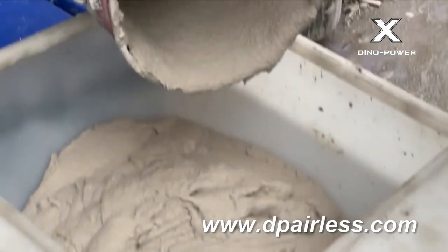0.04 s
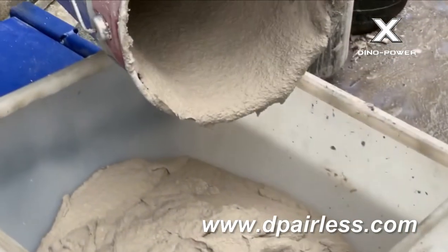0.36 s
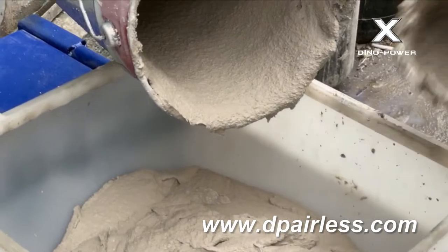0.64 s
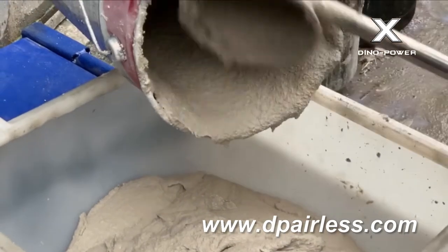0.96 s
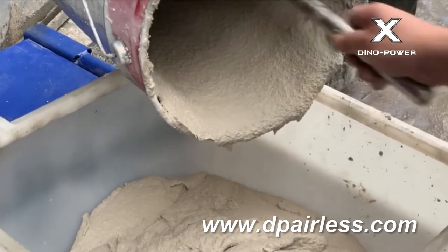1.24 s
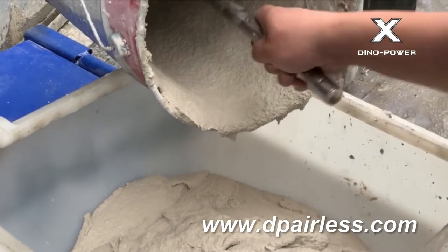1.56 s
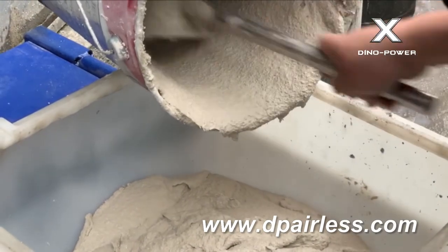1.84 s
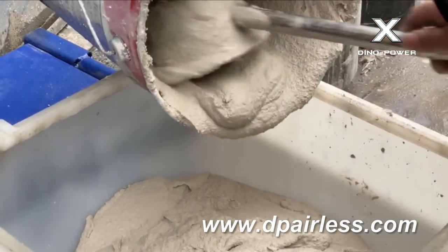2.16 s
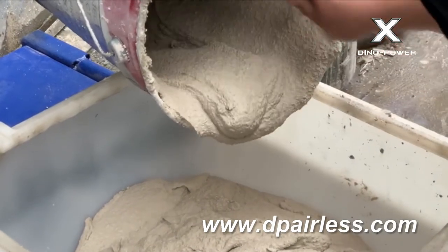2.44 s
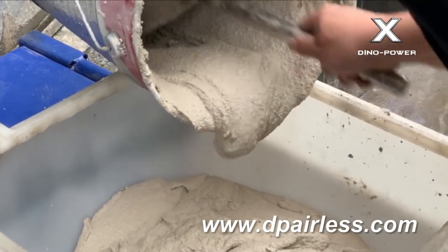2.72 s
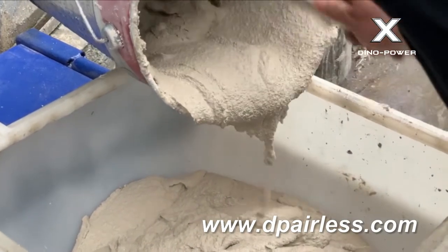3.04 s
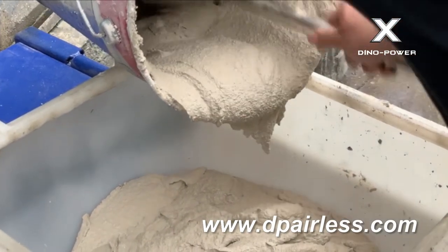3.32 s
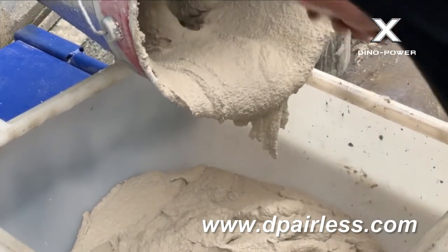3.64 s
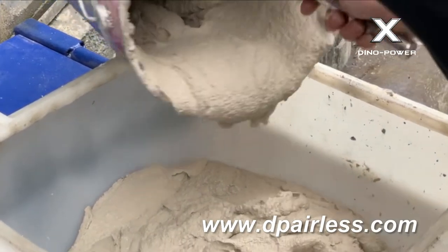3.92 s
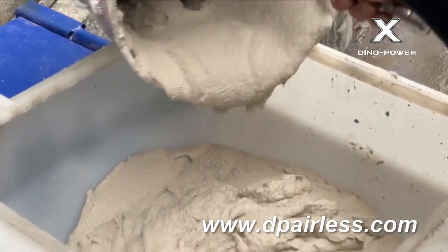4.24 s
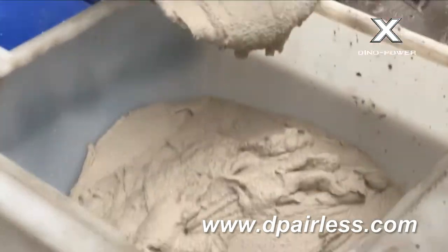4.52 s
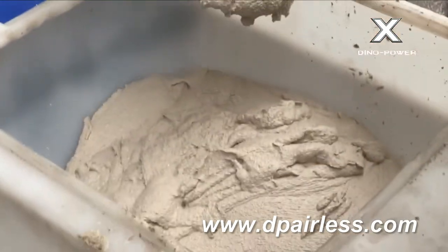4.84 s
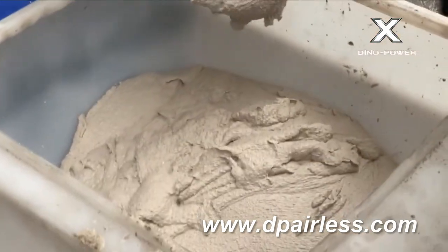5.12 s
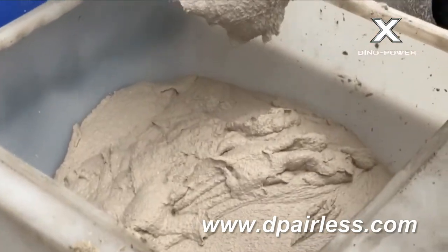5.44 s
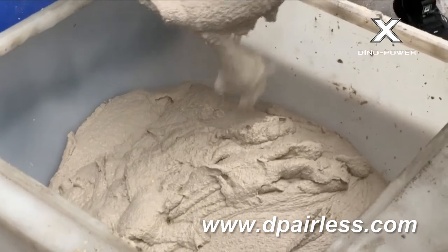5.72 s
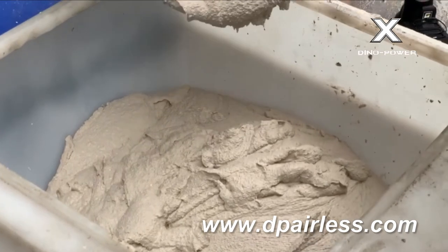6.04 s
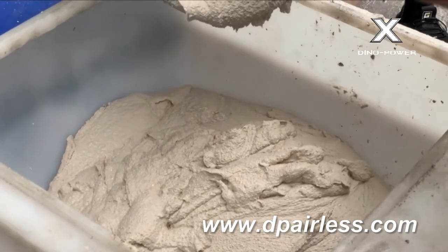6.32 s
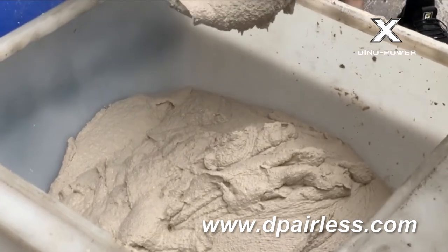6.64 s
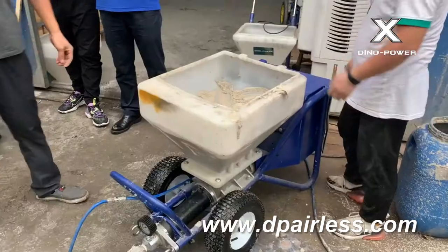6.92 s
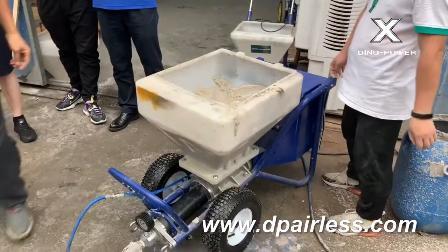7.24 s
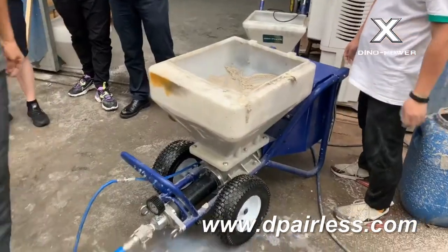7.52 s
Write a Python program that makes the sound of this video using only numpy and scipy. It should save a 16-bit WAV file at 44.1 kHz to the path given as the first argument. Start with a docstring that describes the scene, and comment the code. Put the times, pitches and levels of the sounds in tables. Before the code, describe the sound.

Rushing fan air, a low drone and a humming, whining motor fill a yard as a plaster pump runs, its pitch sagging a little under load. Nearby and central, a steel shovel rasps through wet plaster in a plastic bucket, drags with a brief hollow groan, and knocks softly against the bucket at uneven intervals. The machine stays the main sound and carries on until an abrupt cut.

```python
"""From the start a plaster pump runs, heard at two microphone ports: a low drone, a rush of cooling air,
and a fast motor whose hum of shaft orders and thin high whine sag a little in pitch with load.
Close by, a shovel scrapes wet plaster out of a plastic bucket: first sand grains ring the blade in gritty
rasps, then near 2 s it drags along the wall with a stick-slip groan. Dull bumps of the bucket come and go
until about 6 s. The machine runs on, and the sound stops dead just before 7 s."""
import sys
import numpy as np
from scipy import signal
from scipy.fft import rfft, irfft, next_fast_len
from scipy.io import wavfile
from scipy.ndimage import uniform_filter1d

SR = 44100
rng = np.random.default_rng(int(sys.argv[2]) if len(sys.argv) > 2 else 0)


def waveform_to_disk(signal):
    """Save audio, clipped to [-1, 1], as 16-bit WAV at the path in sys.argv[1]."""
    frames = np.transpose(np.atleast_2d(signal))
    scaled = np.clip(frames, -1, 1) * 32767
    samples = np.round(scaled).astype(np.int16)
    wavfile.write(sys.argv[1], SR, samples)


N = 342657
TIME = np.arange(N) / SR


def gain_of(db):
    """Amplitude ratio of a level in decibels."""
    return 10 ** (np.asarray(db) / 20)


def unit_rms(x):
    """Normalisation to rms 1."""
    return x / np.sqrt(np.mean(x ** 2) + 1e-20)


def curve(rows, t=TIME):
    """Linear interpolation of (time [s], value) rows."""
    return np.interp(t, *np.transpose(rows))


def at_frequency(rows, hz):
    """Interpolation of (frequency [Hz], value) rows on a logarithmic frequency axis."""
    f, value = np.transpose(rows)
    return np.interp(np.log(hz + 1), np.log(f + 1), value)


def add(mix, start_s, sound):
    """Superposition of a sound on the mix."""
    part = mix[round(start_s * SR):][:len(sound)]
    part += sound[:len(part)]


def wander(rate_hz):
    """Low-pass noise: a smooth random fluctuation of rms 1."""
    size = next_fast_len(N)
    hz = np.fft.rfftfreq(size, 1 / SR)
    spectrum = rfft(rng.standard_normal(size)) / (1 + (hz / rate_hz) ** 4)
    return unit_rms(irfft(spectrum, size)[:N])


def resonate(x, hz, width_hz):
    """Forced resonance with a peak gain of 1 and a centre that follows the curve hz."""
    carrier = np.exp(2j * np.pi * np.cumsum(hz) / SR)
    r = np.exp(-np.pi * width_hz / SR)
    envelope = signal.lfilter([(1 - r) ** 2], [1, -2 * r, r * r], x / carrier + 1e-18)
    return 2 * (carrier * envelope).real


# Likeness of the machine's sound at the two ports: (frequency [Hz], coherence [0-1])
PORT_COHERENCE = [(100, 0.98), (350, 0.95), (600, 0.61), (850, 0.8), (1350, 0.56), (1650, 0.8),
                  (2400, 0.67), (3000, 0.44), (3800, 0.18), (5000, 0.8), (6000, 0.45), (7000, 0.91),
                  (9900, 1.0), (14000, 0.67)]
# Phase by which the left port leads: (frequency [Hz], phase [rad])
PORT_LEAD = [(100, -0.14), (600, -0.61), (1150, -0.77), (1450, 0.21), (2000, 0.03), (2450, -1.64),
             (3500, -1.9), (4900, -3.09), (5850, -2.0), (6500, -0.44), (7400, 0.17), (9900, 3.14),
             (12400, 6.28), (15000, 9.66)]

def tone(cycles, scatter, fade_hz=6.6, sideways=1):
    """Multipath interference: direct and scattered sound sum to a fading stereo tone of rms 1."""
    mean_hz = cycles[-1] * SR / N
    step_s = 1 / 400
    knots = np.arange(0, N / SR + 1, step_s)
    noise = rng.standard_normal((2, 2, len(knots)))
    r = np.exp(-2 * np.pi * fade_hz * step_s)
    fading = unit_rms(signal.lfilter([1], [1, -2 * r, r * r], noise)) / np.sqrt(2)
    shared, opposed = [np.interp(TIME, knots, real + 1j * imag) for real, imag in fading]
    # a source less far to the side reaches the two ports more nearly together
    direct = np.exp(-1j * sideways * at_frequency(PORT_LEAD, mean_hz) * np.array([[0], [1]]))
    apart = np.clip(1 - at_frequency(PORT_COHERENCE, mean_hz), 0, 1) * scatter
    field = direct * (1 + scatter * shared) + apart * opposed * np.array([[1], [-1]])
    return unit_rms((field * np.exp(2j * np.pi * (cycles + rng.random()))).real)


# Partials of the slow pump drive: (frequency [Hz], level before the swell [dB])
DRIVE_PARTIALS = [(49, -51.5), (98, -60), (147.5, -53.5), (184, -55.5)]
# Their common swell: (time [s], gain [dB])
DRIVE_SWELL = [(0, -1), (.8, -1.5), (2, 3), (4, 0.5), (5.6, 2.5), (6.9, 3)]

def pump_drive():
    """Periodic vibration of the slow drive radiates a low line spectrum."""
    partials = sum(gain_of(db) * tone(hz * TIME, scatter=0.16, fade_hz=2.3) for hz, db in DRIVE_PARTIALS)
    return partials * gain_of(curve(DRIVE_SWELL))


# Spectrum of the cooling air: (frequency [Hz], relative density [dB])
AIR_SPECTRUM = [(28, -40.5), (42, -15), (65, -6.5), (130, -3.5), (190, -4.5), (290, -6), (420, -4),
                (600, -4), (1400, -4.5), (3500, -1.5), (5200, -3), (6200, -5.5), (9000, -7.5), (10300, -10),
                (13700, -9), (15600, -30.5)]
# Resonances and one dip of the fan housing: (frequency [Hz], half-width [Hz], gain [dB])
HOUSING_RESONANCES = [(760, 55, 5), (900, 90, 2.6), (1060, 70, 2.6), (1270, 70, 2.6), (1780, 130, 0.6),
                      (2080, 70, -1.8), (3800, 140, 1.5)]
# Shading of the treble along the path: (time [s], gain [dB])
TREBLE_SHADE = [(0, -0.6), (1.1, -1), (2.1, -1.5), (3.0, -1.4), (3.8, -0.9), (5.0, -1.7), (6.9, -2.1)]
# Left port against right in the rush: (frequency [Hz], level difference [dB])
PORT_BALANCE = [(60, 0), (110, -0.5), (200, -1), (380, 1), (700, -1.5), (1290, -2.5), (2380, 0),
                (4400, 0.6), (7000, -0.2), (15000, 0)]

def cooling_fan(level_db=-27.5, patchy_db=1.5, flutter_db=0.3, ripple_db=3.23):
    """Turbulence makes broadband noise, filtered by the housing, by shading and by reflections."""
    frames, hz = N // 512 + 5, np.fft.rfftfreq(2048, 1 / SR)
    t = np.arange(frames) * 512 / SR
    a, b, c, d, patches, ripple = rng.standard_normal((6, frames, len(hz)))
    patches = unit_rms(uniform_filter1d(uniform_filter1d(patches, 8, axis=0), 16, axis=1))
    # reflections from floor and hopper ripple the spectrum, shifting slowly as people move
    ripple = unit_rms(uniform_filter1d(uniform_filter1d(ripple, 320, axis=0), 4, axis=1))
    ripple *= hz ** 2 / (hz ** 2 + 900 ** 2)  # long waves, below 900 Hz, diffract around them
    housing_db = sum(db / (1 + ((hz - f) / width) ** 4) for f, width, db in HOUSING_RESONANCES)
    shade_db = curve(TREBLE_SHADE, t)[:, None] * hz ** 2 / (hz ** 2 + 2200 ** 2)
    colour_db = at_frequency(AIR_SPECTRUM, hz) + housing_db + shade_db
    coherence = np.clip(at_frequency(PORT_COHERENCE, hz), 0, .999)
    left = a + 1j * b
    right = coherence * left + np.sqrt(1 - coherence ** 2) * (c + 1j * d)
    right *= np.exp(-1j * at_frequency(PORT_LEAD, hz))
    balance = gain_of(at_frequency(PORT_BALANCE, hz) / 2)
    spectra = np.array([left * balance, right / balance])
    spectra *= gain_of(colour_db + patchy_db * patches + ripple_db * ripple)
    _, rush = signal.istft(np.swapaxes(spectra, -1, -2), nperseg=2048, noverlap=1536)
    return unit_rms(rush[:, :N]) * gain_of(level_db + flutter_db * wander(44.0))


# Hum at the shaft rate: (time [s], level before the trim [dB])
SHAFT_HUM = [(0.0, -42), (1.1, -41.5), (1.98, -38), (2.2, -48), (2.55, -53), (2.84, -43.5), (3.6, -45.5),
             (4.3, -42.5), (4.95, -44.5), (5.2, -50), (6.03, -46), (6.39, -50.5), (6.7, -45), (6.91, -44.5)]
# The three loudest orders, each swelling on its own: {order: (time [s], level [dB])}
SWELLING_ORDERS = { 4: [(0, -48), (2.9, -48.5), (3.4, -43.5), (4.3, -43.5), (5.5, -45), (6.9, -43.5)],
                   5: [(0, -48), (1.7, -47), (1.9, -42), (2.3, -46), (2.65, -41), (3.05, -40.5),
                   (3.25, -44), (3.9, -43), (4.1, -47), (6.9, -49)], 6: [(0, -50), (1.2, -50), (1.5, -43),
                   (2.15, -43), (2.5, -49), (2.75, -42.5), (3.05, -41), (3.25, -50), (3.7, -44), (4.1, -44),
                   (4.4, -50), (5.4, -47.5), (5.8, -43.5), (6.1, -47.5), (6.9, -51)]}
# Weaker orders; fractional ones come from bearings and gears, and those near 5 beat into a rattle:
# (frequency [multiples of the shaft rate])
WEAK_ORDERS = [2, 2.59, 3, 3.46, 4.33, 4.63, 4.815, 5.37, 7, 8, 10, 11, 12, 13, 15.55, 18, 18.58, 20, 25]
# Strength of each weaker order: (level [dB])
WEAK_ORDER_LEVELS = [-49, -53.5, -52, -55, -53, -50, -49, -53, -51, -50, -53.5, -55, -52, -56, -56, -56,
                     -56, -57, -57]

def shaft_hum(turns, hum_trim_db=-2.0):
    """Rotation forces vibration at the shaft rate and at multiples of it, the orders."""
    hum = gain_of(curve(SHAFT_HUM) + hum_trim_db) * tone(turns, scatter=0.32, fade_hz=20.76)
    loud = sum(gain_of(curve(level)) * tone(order * turns, scatter=0.46)
               for order, level in SWELLING_ORDERS.items())
    weak = sum(gain_of(db) * tone(order * turns, scatter=0.36, fade_hz=5.1)
               for order, db in zip(WEAK_ORDERS, WEAK_ORDER_LEVELS))
    return hum + loud + weak


def bearings(turns, sag_hz, whirr_order=5.185, thin_order=40.37):
    """Bearings radiate non-integer orders: a whirr that grows as load slows the shaft, and a thin whine."""
    whirr = gain_of(-47.8 + 1.3 * sag_hz) * tone(whirr_order * turns, scatter=0.45, fade_hz=8.0)
    thin = gain_of(-53) * tone(thin_order * turns, scatter=0.4, fade_hz=10.0, sideways=0.72)
    return whirr + thin


# Tone of the meshing gear: (time [s], level [dB])
MESH_LEVEL = [(0, -48.5), (.5, -43), (1.35, -44.5), (1.7, -50), (3.0, -51.5), (3.7, -49), (4.2, -56),
              (5.4, -54), (6.9, -62.5)]

def gear_mesh(turns, teeth=9):
    """The mesh frequency is the shaft rate times the number of teeth."""
    return gain_of(curve(MESH_LEVEL)) * tone(teeth * turns, scatter=0.6, fade_hz=12.0, sideways=0.9)


# Whine of the passing rotor slots: (time [s], level [dB])
SLOT_WHINE = [(0.0, -36.5), (0.2, -37.5), (0.45, -31), (0.7, -33.5), (1.18, -37), (1.31, -34),
              (2.44, -38.5), (2.85, -31.5), (3.05, -32), (3.3, -34), (3.54, -39), (3.82, -31), (4.1, -34.5),
              (4.45, -38.5), (4.97, -31.5), (5.09, -41), (5.17, -29), (5.26, -32), (5.33, -40.5),
              (5.7, -35.5), (5.85, -32.5), (6.08, -34), (6.45, -39), (6.58, -30.5), (6.7, -38.5),
              (6.91, -35)]
# Squeaky whistle at half the slot rate: (time [s], level [dB])
SLOT_WHISTLE = [(0, -61.5), (2.5, -58), (3.6, -44.5), (4.75, -56), (4.84, -37.5), (4.93, -55.5),
                (5.38, -57), (5.47, -37.5), (5.55, -52.5), (5.82, -38.5), (6.3, -63), (6.9, -52)]

def rotor_slots(turns, slots=30):
    """Each passing slot gives one cycle of a high whine; a subharmonic whistles an octave below."""
    whine = tone(slots * turns, scatter=0.73, fade_hz=22.0)
    whistle = tone(slots / 2 * turns, scatter=0.4, fade_hz=6.0, sideways=0.8)
    return gain_of(curve(SLOT_WHINE)) * whine + gain_of(curve(SLOT_WHISTLE)) * whistle


# The shaft sags and recovers with load: (time [s], rotation rate [Hz])
SHAFT_SPEED = [(0.0, 375.8), (0.14, 377.8), (0.35, 377.5), (0.53, 374.2), (0.78, 377.6), (0.87, 374.2),
               (1.18, 377.8), (1.6, 376), (1.92, 377.5), (2.2, 373.8), (2.45, 372.8), (2.8, 376),
               (3.05, 376), (3.32, 380.5), (3.7, 382.8), (3.9, 381.5), (4.12, 383), (4.24, 378),
               (4.76, 375.7), (4.81, 370.8), (5.1, 373.6), (5.21, 372), (5.42, 376), (5.72, 371.2),
               (5.9, 369.8), (6.28, 375.2), (6.4, 372.8), (6.55, 376.6), (6.75, 375), (6.87, 372)]

def motor(usual_hz=376, hunt=0.000824, hunt_hz=5.5, jitter=0.0006, jitter_hz=26.6):
    """Common frequency modulation: every motor tone follows one slightly unsteady shaft."""
    speed_hz = curve(SHAFT_SPEED)
    sag_hz = np.maximum(usual_hz - speed_hz, 0)
    unsteadiness = 1 + hunt * wander(hunt_hz) + jitter * wander(jitter_hz)
    turns = np.cumsum(speed_hz * unsteadiness) / SR
    return shaft_hum(turns) + bearings(turns, sag_hz) + gear_mesh(turns) + rotor_slots(turns)


# Gritty strokes of the steel shovel:
# (start [s], duration [s], resonance [Hz], width [Hz], level [dB], left phase lead [rad])
BLADE_STROKES = [(0.23, 0.31, 3870, 230, -40.5, -2.3), (0.24, 0.32, 3290, 300, -41, -1.4),
                 (0.30, 0.26, 2520, 260, -44, -1.8), (0.55, 0.18, 2590, 150, -37, -1.6),
                 (0.81, 0.46, 2470, 260, -39.5, -1.6), (0.96, 0.33, 3350, 270, -40.5, -1.8),
                 (1.38, 0.075, 3420, 110, -37, -0.5), (2.17, 0.075, 3400, 130, -41, -0.3)]

def blade_rasps(grains_per_s=640, grain_spread_db=2.5, fade_s=0.038, echo_gain=0.45):
    """Shot noise: sand grains catch on the blade and ring it; the yard adds its own echo at each port."""
    out = np.zeros((2, N))
    for start, length, hz, width_hz, db, lead in BLADE_STROKES:
        t = np.arange(0, length, 1 / SR)
        sizes = gain_of(grain_spread_db * np.minimum(rng.exponential(1, (3, len(t))), 3))
        impacts = sizes * (rng.random(sizes.shape) < grains_per_s / SR)
        rings = [resonate(train, np.full(len(t), hz), width_hz) for train in impacts]
        direct, *echoes = [unit_rms(signal.hilbert(ring)) for ring in rings]
        envelope = np.clip(np.minimum(t, length - t) / fade_s, 0, 1)
        for port, lag, echo in zip(out, (0, lead), echoes):
            rasp = (direct * np.exp(-1j * lag) + echo_gain * echo).real
            add(port, start, gain_of(db) * envelope * unit_rms(rasp))
    return out


# Modes of the plaster-laden bucket: (frequency [ratio to the main mode], relative level [dB], T60 [s])
BUCKET_MODES = [(1, 0, .048), (.76, -22, .11), (1.9, -18, .05), (3.05, -24, .06)]

def bucket_ring(hz, contact_s, upper_db=0):
    """Damped modal vibration of peak 1, building up over a contact cushioned by wet plaster."""
    t = np.arange(SR // 4) / SR
    modes = sum(gain_of(db + upper_db * (ratio > 1) - 60 * t / t60) * np.sin(2 * np.pi * hz * ratio * t)
                for ratio, db, t60 in BUCKET_MODES)
    ring = modes * (1 - np.exp(-(t / (2 * contact_s)) ** 3))
    return ring / abs(ring).max()


# The blade drags along the bucket wall: (time [s], level [dB])
DRAG_LEVEL = [(1.78, -52), (1.86, -39), (1.91, -33.5), (1.95, -31), (2.0, -29), (2.04, -33), (2.085, -33),
              (2.12, -52)]
# The air pocket behind the blade rings hollow as the scoop opens: (time [s], resonance [Hz])
POCKET_RESONANCE = [(1.89, 520), (1.94, 537), (1.98, 567), (2.06, 520)]

def shovel_drag(slip_hz=180, rate_spread=0.06, force_spread=0.35, pocket_db=-8.5, judder_db=1.0):
    """Stick-slip friction, roughly in step with the wall's main mode, drives wall and air pocket."""
    cycles = np.cumsum(slip_hz * (1 + rate_spread * wander(40.0))) / SR
    slips = np.diff(np.floor(cycles), prepend=0) * (1 + force_spread * rng.standard_normal(N))
    # each slip tugs and lets go, which leaves little bass and stirs the upper modes
    tug = np.diff(bucket_ring(slip_hz, contact_s=.0013, upper_db=-3))
    wall = unit_rms(signal.oaconvolve(slips, tug)[:N])
    pocket = unit_rms(resonate(slips, curve(POCKET_RESONANCE), width_hz=55))
    groan = unit_rms((wall + gain_of(pocket_db) * pocket) * gain_of(judder_db * wander(45.0)))
    touching = (TIME > DRAG_LEVEL[0][0]) & (TIME < DRAG_LEVEL[-1][0])
    return groan * gain_of(curve(DRAG_LEVEL)) * touching


# The shovel strikes the bucket: (time [s], peak level [dB], main mode [Hz])
SHOVEL_IMPACTS = [(0.943, -31.5, 211), (1.028, -32.5, 336), (1.645, -30, 243), (1.705, -19.5, 233),
                  (1.94, -19, 159), (1.984, -17.5, 175.5), (2.007, -21, 206), (2.023, -21.5, 166),
                  (2.044, -25, 201), (2.070, -29, 177), (2.525, -21, 221), (2.528, -19.5, 132),
                  (2.550, -32, 215), (2.856, -22.5, 450), (2.859, -13.5, 238), (2.874, -26, 173),
                  (2.9, -28, 286), (3.282, -27.5, 135), (3.796, -30.5, 206), (4.473, -29, 183),
                  (4.671, -32, 217), (5.304, -23.5, 190), (5.325, -29.5, 186), (5.674, -29, 193),
                  (5.916, -30, 201)]

def shovel_bumps(contact_cycles=0.76):
    """Impact excitation: soft blows, single or in a juddering run, set the bucket's modes ringing."""
    out = np.zeros(N)
    for start, db, hz in SHOVEL_IMPACTS:
        add(out, start, gain_of(db) * bucket_ring(hz, contact_s=contact_cycles / hz))
    return out


def scene():
    """Superposition: the machine fills the yard; the bucket is close and central."""
    machine = cooling_fan() + motor() + pump_drive()
    return machine + blade_rasps() + shovel_drag() + shovel_bumps()


def record(dry, stop_s=6.933, cutoff_hz=15750):
    """Gating and band limiting: an abrupt stop, then a steep low-pass filter."""
    gate = np.clip((stop_s - TIME) / .002, 0, 1)
    lowpass = signal.firwin(2047, cutoff_hz, window=("kaiser", 9), fs=SR)
    return signal.oaconvolve(dry * gate, lowpass[None], "same")


dry = scene()
out = record(dry)
waveform_to_disk(out)
```